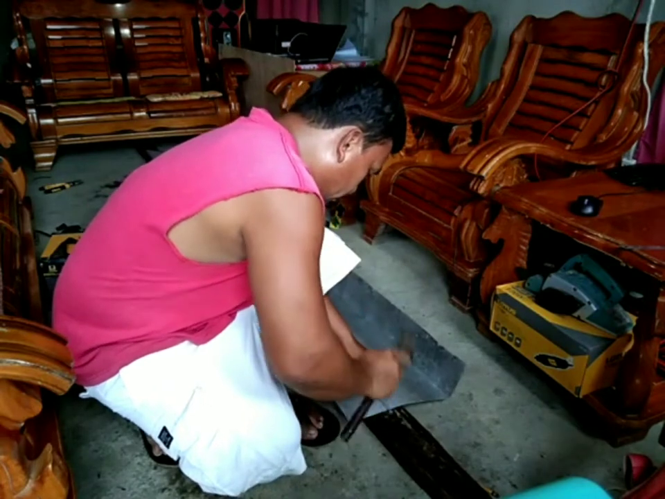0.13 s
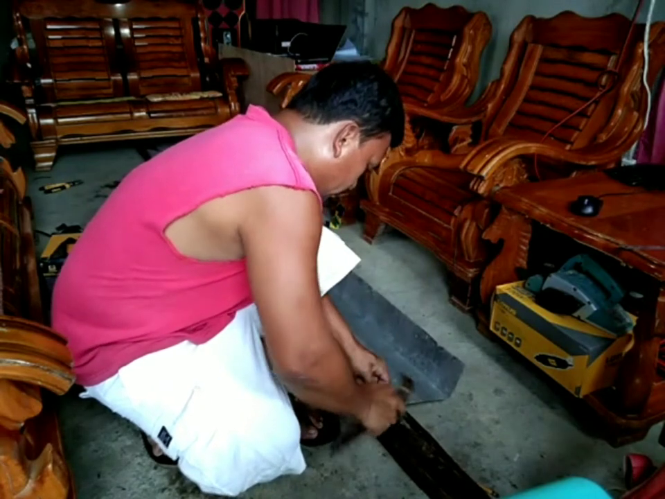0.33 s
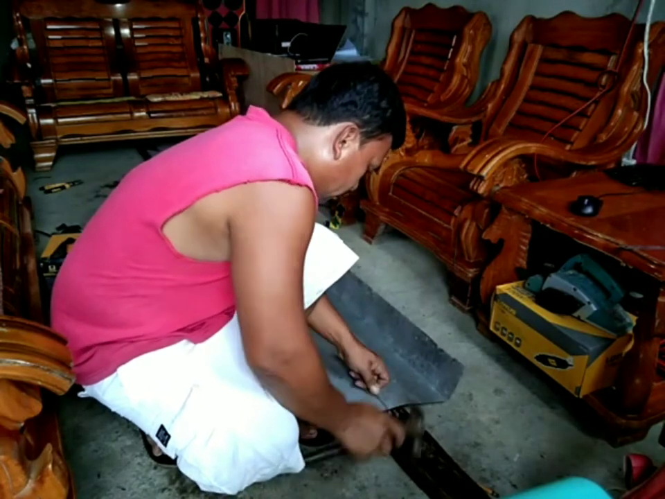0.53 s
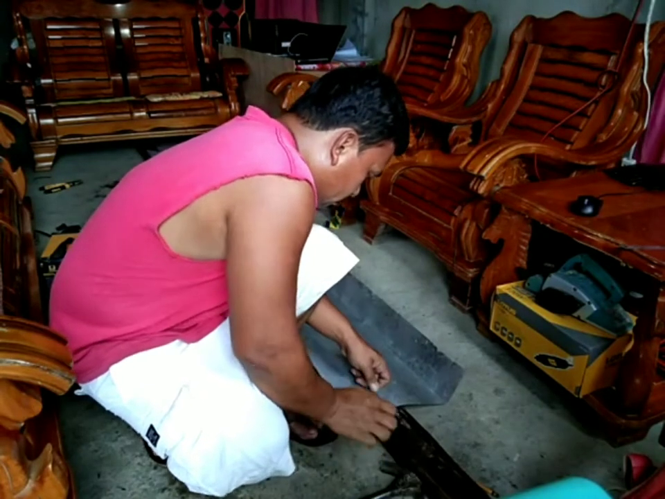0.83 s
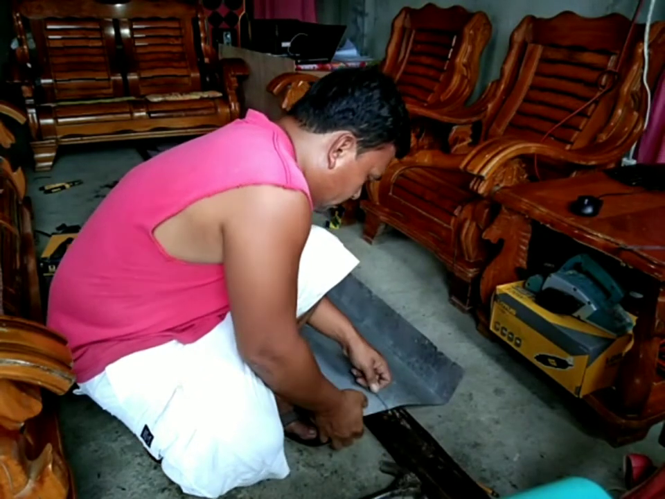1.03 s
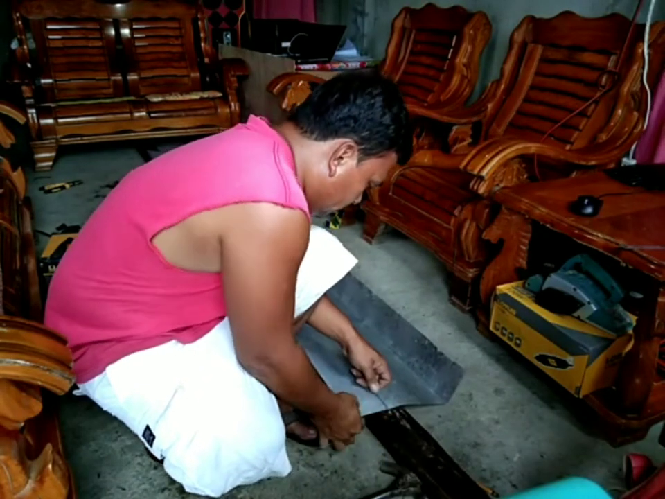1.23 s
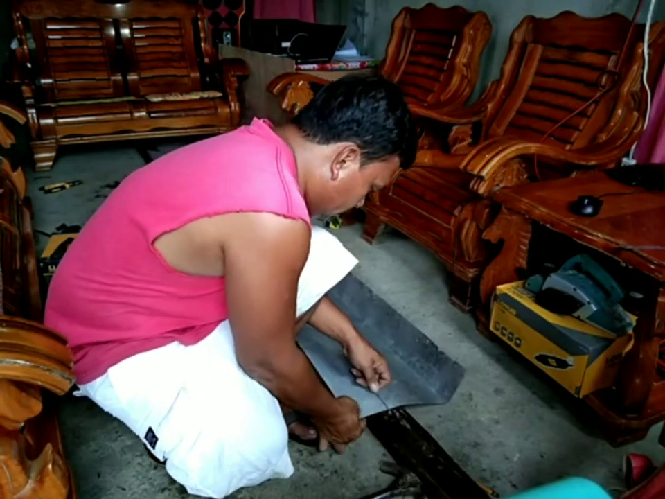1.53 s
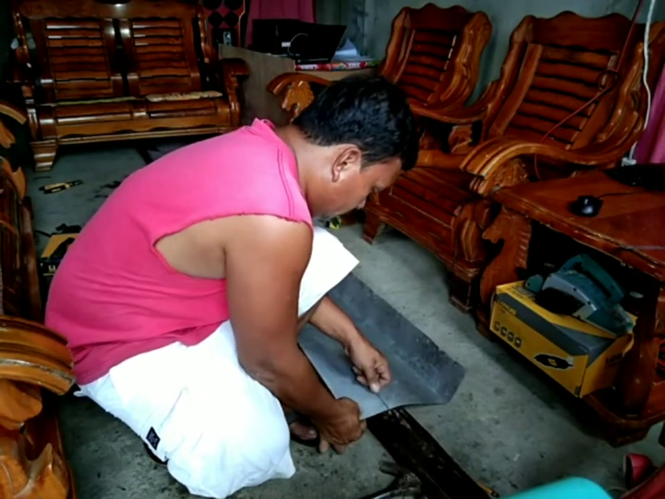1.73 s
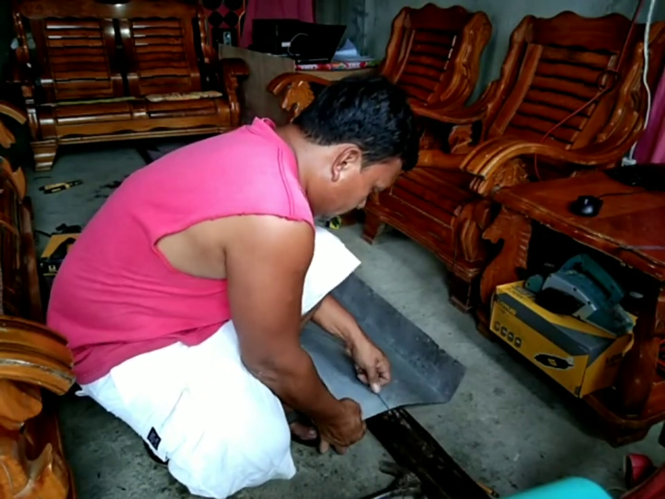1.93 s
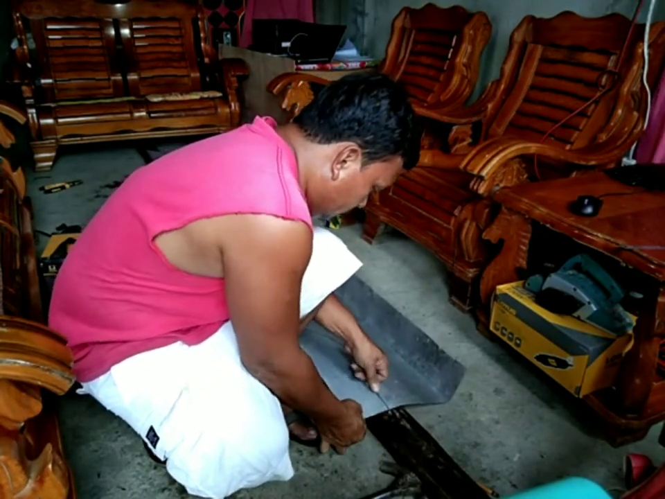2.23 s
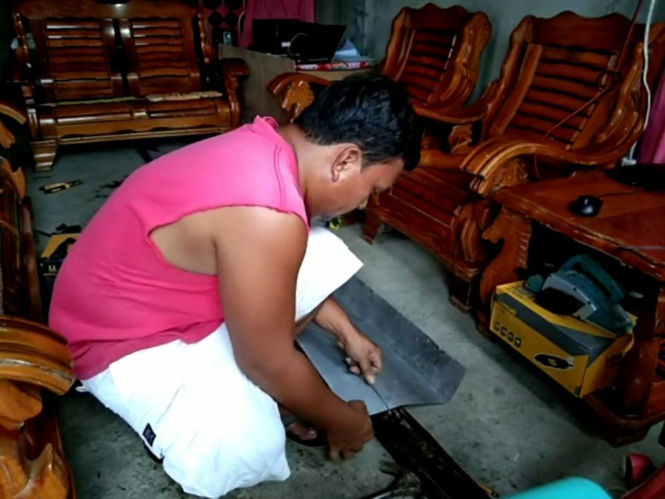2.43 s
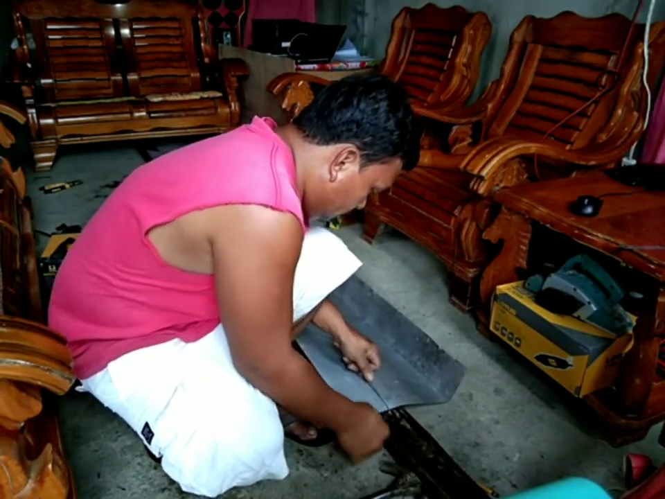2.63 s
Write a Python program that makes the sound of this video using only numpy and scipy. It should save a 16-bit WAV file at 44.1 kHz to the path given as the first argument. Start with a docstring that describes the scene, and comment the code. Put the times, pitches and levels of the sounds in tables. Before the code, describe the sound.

A thin metal sheet on a floor indoors, already ringing, crashes under two hammer blows at about 0.1 and 0.5 seconds, each thumping and spreading into a shimmer. Around 0.9 seconds a steel hammer and chisel clink down as the sheet rattles. The ringing fades by 1.5 seconds. A faint scrape comes near 2.4 seconds, then two soft flexing rattles. A low motor hums quietly throughout.

```python
"""Two hammer blows crash on a thin metal sheet lying on a floor indoors, over an earlier one dying away.
Each clicks and thumps, then spreads upward through the sheet's modes into a shimmer. A steel hammer and
chisel are put down and clink together; the sheet rattles softly as hands bend it, and a tool scrapes
its edge. A motor hums in the room throughout."""
import sys
import numpy as np
from scipy import signal
from scipy.fft import rfft, irfft, next_fast_len
from scipy.io import wavfile
from scipy.ndimage import uniform_filter1d, map_coordinates

SR = 44100
rng = np.random.default_rng(int(sys.argv[2]) if len(sys.argv) > 2 else 0)


def log_audio(samples):
    """Write samples as a 16-bit WAV file to the path given in sys.argv[1]."""
    # one column per channel
    frames = np.atleast_2d(samples).T
    # limit to full scale, then quantise
    limited = np.clip(frames, -1, 1)
    pcm = np.round(limited * 32767).astype(np.int16)
    wavfile.write(sys.argv[1], SR, pcm)


N = 123479

# hammer blows on the sheet, the first already dying away:
# start_s, shimmer_db, brightness_db_per_octave, hold_s, click_db, thump_db, knock_db
BLOWS = [(-.36, -12.5, 2.5, .14, -28, -29, -30), (.135, -14.5, 0.1, 0.2, -17.5, -17.5, -28.5),
         (0.456, -14, 2.5, 0.17, -20, -23, -19)]
TOP_HZ = 8450  # band limit


def amp(db):
    """Decibels to gain."""
    return 10 ** (np.asarray(db) / 20)


def unit(x):
    """Scale to rms 1."""
    return x / np.sqrt(np.mean(x ** 2) + 1e-20)


def along(points, hz):
    """Read (pitch_hz, value) points on a log frequency axis."""
    pitches, values = np.transpose(points)
    return np.interp(np.log(hz + 1), np.log(pitches + 1), values)


def since(start_s):
    """Seconds after the start, zero before it."""
    return np.maximum(np.arange(N) / SR - start_s, 0)


def fade(t, t60):
    """Exponential decay, 60 dB down after t60 seconds."""
    return np.exp(-np.log(1000) * t / t60)


def wobble(rate):
    """A smooth random curve, rate knots a second."""
    steps = np.arange(0, N, 32)
    knots = rng.standard_normal(int(N * rate / SR) + 4)
    return np.interp(np.arange(N), steps, map_coordinates(knots, [steps * rate / SR]))


def filtered(x, response):
    """Equalise x with the gain response(hz)."""
    size = next_fast_len(N + 8192)
    return irfft(rfft(x, size) * response(np.fft.rfftfreq(size, 1 / SR)), size)[:N]


def noise(response):
    """Noise of rms 1 shaped by response(hz)."""
    return unit(filtered(rng.standard_normal(N), response))


def coloured(colour):
    """Noise of rms 1 shaped by (pitch_hz, gain_db) points."""
    return noise(lambda hz: amp(along(colour, hz)))


def tone(hz, drift, rate):
    """A sine of rms 1 whose phase wanders by about drift radians."""
    return np.sqrt(2) * np.sin(2 * np.pi * (hz * since(0) + rng.random()) + drift * wobble(rate))


def motor(load_hz=253, load_width_hz=25):
    """A hum that throbs once a turn and fills out at higher speed, over low rumble and faint hiss."""
    # running speed: time_s, turns_per_s
    speed_curve = [(0, 26.3), (1.2, 27.3), (1.45, 26.8), (1.72, 25.9), (2.1, 25.75), (2.8, 25.75)]
    # hum lines: multiple_of_speed, level_db
    harmonics = [(2, -61.5), (4, -52), (5, -42.5), (6, -45), (7, -54.5), (9, -57.5), (10, -60), (13, -54),
                 (14, -50.5), (16, -53.5), (17, -58)]
    # rumble loudness: time_s, level_db
    rumble_level = [(0, -36.5), (0.899, -38.5), (1.352, -38.5), (1.55, -41), (1.75, -45.5), (2.3, -47.5),
                    (2.79, -43.5)]
    # rumble and hiss spectra: pitch_hz, gain_db
    rumble_colour = [(25, -32.5), (55, -10), (120, 0), (200, 0.5), (275, -2), (390, -0.5), (500, -9.5),
                     (620, -29), (1000, -37), (3000, -58.5)]
    hiss_colour = [(300, -2), (1000, -6), (3000, -8.5), (8000, -13.5)]
    speed = np.interp(since(0), *np.transpose(speed_curve))
    turns, hum = np.cumsum(speed) / SR, np.zeros(N)
    load_db = 6.5 * (speed - speed.min())
    for multiple, db in harmonics:
        in_load_band = np.exp(-((multiple * speed - load_hz) / load_width_hz) ** 2)
        phase = 2 * np.pi * multiple * turns + 0.36 * wobble(6.9)
        hum += amp(db + load_db * in_load_band) * np.sqrt(2) * np.sin(phase)
    hiss = amp(-69.5) * coloured(hiss_colour)
    rumble_db = np.interp(since(0), *np.transpose(rumble_level))
    return hum + hiss + amp(rumble_db) * coloured(rumble_colour)


def watery_tones(width_hz=75, flutter_db=2):
    """Faint, scattered, watery tones of a noise suppressor: narrow, fluttering swells of noise."""
    # swells of narrow noise: start_s, length_s, pitch_hz, level_db
    swells = [(1.27, .21, 2448, -65), (1.33, .16, 1890, -69), (1.37, .2, 803, -59), (1.52, .25, 1517, -69),
              (1.6, .28, 2457, -67), (1.71, .22, 814, -62), (1.78, .1, 1845, -71), (1.76, .37, 2106, -77),
              (2.02, .17, 2510, -71), (2.18, .11, 833, -60), (1.37, .17, 7240, -79)]
    flutter = amp(flutter_db * wobble(44.9))
    out = np.zeros(N)
    for start_s, length_s, pitch_hz, db in swells:
        arch = np.sin(np.pi * np.minimum(since(start_s) / length_s, 1))
        band = noise(lambda hz: 1 / (1 + ((hz - pitch_hz) / width_hz) ** 4))
        out += amp(db) * arch * flutter * band
    return out


def scrape(grain_count, spread_db=3):
    """A tool drags on the sheet's edge: a dense rasp of tiny ringing grains, then a few single ticks."""
    # the drag: start_s, length_s, level_db
    start_s, length_s, level_db = (2.372, .075, -57.5)
    # rasp spectrum: pitch_hz, gain_db
    colour = [(600, -0.5), (1600, 6.5), (2500, 3.5), (3200, -4), (5200, -2.5), (6400, -13.5), (7400, -1),
              (8400, -25)]
    # light taps on the edge: start_s, pitch_hz, level_db
    taps = [(2.378, 3520, -66), (2.446, 4280, -58), (2.465, 4000, -58.5), (2.588, 3870, -70),
            (2.608, 6200, -74), (2.637, 6200, -73)]
    grains, t = np.zeros(N + SR), np.arange(SR // 6) / SR
    decay = fade(t, t60=.12)
    for when, pitch, size in rng.random((grain_count, 3)):
        gain = np.sin(np.pi * when) ** .5 * amp(-spread_db * np.log(size + .02))
        onset = round((start_s + length_s * when) * SR)
        grains[onset:][:len(t)] += gain * decay * np.sin(2 * np.pi * TOP_HZ * pitch * t)
    rasp = unit(filtered(grains[:N], lambda hz: amp(along(colour, hz))))
    out = amp(level_db) * rasp * np.sqrt(length_s * SR / N)
    for tap_s, hz, db in taps:
        age = since(tap_s)
        out += amp(db) * (age > 0) * fade(age, t60=.11) * tone(hz, drift=0.8, rate=110)
    return out


def plate(spacing_hz, ripple_db, width_hz=7.6):
    """The sheet's frequency response: crowded random modes under a few strong ones."""
    # strongest modes: pitch_hz, boost_db
    modes = [(416, 10), (442, 5), (533, 10), (797, 3), (867, 4), (1033, 5), (1108, 6), (1519, 4), (1689, 5),
             (2233, 5), (2380, 6), (2494, 5), (2578, 4), (2869, 6)]
    grid = np.arange(0, SR / 2, 2)
    ripple = ripple_db * map_coordinates(rng.standard_normal(4000), [grid / spacing_hz], mode="wrap")
    peaks = sum(db / (1 + ((grid - hz) / width_hz) ** 2) for hz, db in modes)
    return lambda hz: np.interp(hz, grid, amp(ripple + peaks))


def shimmer(body, colour, tilt_db, envelope):
    """The sheet's modes shaken at random, tilted per octave, each pitch under envelope(hz, time_s)."""
    shaking = noise(lambda hz: body(hz) * amp(along(colour, hz) + tilt_db * np.log2((hz + 100) / 1500)))
    hz, t, bands = signal.stft(shaking, SR, nperseg=256)
    return signal.istft(bands * envelope(hz[:, None], t), SR, nperseg=256)[1][:N]


def flexes(body, rise_s=.01):
    """Hands bend the sheet, shaking its modes into short, dull rattles."""
    # bends: start_s, level_db, brightness_db_per_octave
    bends = [(0.712, -30.5, 0), (.85, -29.5, 7.5), (.92, -31.5, -3.5), (2.443, -38, 3), (2.672, -40, 0)]
    # rattle spectrum: pitch_hz, gain_db
    colour = [(150, -25.5), (250, -5), (710, -9), (873, -3), (1380, -18), (1550, -11.5), (1930, -31),
              (2300, -18), (2710, -38), (3970, -38), (7690, -52.5), (8400, -73.5)]
    # rattle decay: pitch_hz, t60_s
    ring_times = [(300, 0.89), (1000, 0.84), (2500, 0.5), (5000, 0.219)]
    out = np.zeros(N)
    for start_s, db, tilt_db in bends:
        def envelope(hz, t):
            age = np.maximum(t - start_s, 0)
            return (1 - np.exp(-age / rise_s)) * fade(age, along(ring_times, hz))
        out += amp(db) * np.sqrt(2) * shimmer(body, colour, tilt_db, envelope)
    return out


def steel_ring(modes, contacts, high_hz=6500, rise_s=.001, room_db=-10):
    """Each contact adds energy to every mode of a tool; the room holds the ring as a wavering tail."""
    out, t = np.zeros(N), np.arange(SR) / SR
    feedback = fade(1 / SR, t60=.32) ** 2
    for hz, db, t60 in modes:
        power = np.zeros(N + SR)
        decay = (fade(t, t60) * (1 - np.exp(-t / rise_s))) ** 2
        for start_s, hit_db, high_db in contacts:
            power[round(start_s * SR):][:SR] += amp(hit_db + high_db * (hz > high_hz)) ** 2 * decay
        room_power = signal.lfilter([1 - feedback], [1, -feedback], power[:N])
        echoes = amp(room_db) * np.sqrt(room_power / 2) * (wobble(110) + 1j * wobble(110))
        wave = (np.sqrt(power[:N]) + echoes) * np.exp(2j * np.pi * (hz * since(0) + rng.random()))
        out += amp(db) * np.sqrt(2) * wave.real
    return out


def tools(room_db=-6):
    """Hammer and chisel touch, drop and chatter together on the floor, ticking and ringing."""
    # contacts: start_s, hammer_db, chisel_db, tick_db, high_mode_boost_db
    clinks = [(.858, -34, -49, -54, 3), (.903, -36, -42, -52, 8), (.941, -25, -18, -21, 2),
              (.952, -26, -19.5, -32, 7), (.961, -27, -19, -31, 7), (.973, -27, -18, -38, 0),
              (.984, -26, -18, -38, -12), (.998, -24.5, -17, -33, -8), (1.009, -25.5, -18.5, -35, -10)]
    # modes of the two tools: pitch_hz, level_db, t60_s
    hammer_modes = [(2003, -12, .2), (2560, -17.5, .38), (4152, -3, .17), (4603, 0, .15), (7242, -8.5, .3)]
    chisel_modes = [(3225, -32, .36), (4327, 2, .1), (4452, -20, .2), (5166, -17.5, .18), (5666, -14, .16),
                    (5900, -19, .16), (7650, -17, .24), (8344, -32, .3)]
    # tick spectrum: pitch_hz, gain_db
    tick_colour = [(800, -8.5), (2000, -4.5), (3300, -7), (4400, 0), (5300, 3), (6500, -11.5), (7500, -1),
                   (8500, -14.5)]
    starts, hammer_db, chisel_db, tick_db, high_db = np.transpose(clinks)
    power = np.zeros(N)
    for start_s, db in zip(starts, tick_db):
        age = since(start_s)
        decay = fade(age, t60=.05) + amp(room_db) * fade(age, t60=.3)
        power += (age > 0) * (amp(db) * decay) ** 2
    ticks = np.sqrt(power) * coloured(tick_colour)
    hammer = steel_ring(hammer_modes, list(zip(starts, hammer_db, high_db)))
    chisel = steel_ring(chisel_modes, list(zip(starts, chisel_db, high_db)))
    return ticks + hammer + chisel


def thud(start_s, thump_db, knock_db, lag_s=.006, rise_s=.011):
    """Under the hammer the floor thumps and the sheet knocks with its low modes."""
    # hollow knock: pitch_hz, level_db, t60_s
    knock_modes = [(411, .5, .19), (534, -3, .22)]
    # spectrum of the knock's rattle: pitch_hz, gain_db
    colour = [(40, -25.5), (100, -8.5), (200, -3), (400, 0.5), (550, 3.5), (800, -15.5), (1500, -30.5),
              (4000, -60)]
    age = since(start_s + lag_s)
    thump = fade(age, t60=.18) * tone(hz=129.3, drift=0.99, rate=40)
    knock = sum(amp(db) * fade(age, t60) * tone(hz, drift=0.096, rate=40) for hz, db, t60 in knock_modes)
    rattle = amp(0.5) * fade(age, t60=.17) * coloured(colour)
    rise = 1 - np.exp(-(age / rise_s) ** 2)
    return 2 * rise * (amp(thump_db) * thump + amp(knock_db) * (knock + rattle))


def strikes():
    """The hammer head clicks and thuds on the sheet; afterwards it is set down with duller thuds."""
    # hammer set down: start_s, thump_db, knock_db
    set_downs = [(.708, -36.5, -43), (.912, -33, -32.5)]
    # click spectrum: pitch_hz, gain_db
    colour = [(200, -11.5), (900, -2), (1700, 7), (2600, -12), (5000, -11.5), (6200, -21), (7400, -8.5),
              (8500, -29)]
    out = np.zeros(N)
    for start_s, *_, click_db, thump_db, knock_db in BLOWS:
        age = since(start_s)
        crack = amp(0.5) * fade(age, t60=.0094)  # first contact
        out += amp(click_db) * (age > 0) * (fade(age, t60=.19) + crack) * coloured(colour)
        out += thud(start_s, thump_db, knock_db)
    return out + sum(thud(*contact) for contact in set_downs)


def crashes(body, knee_s=.033, hand_rests_s=1.21):
    """Shaking climbs from low modes to high, holds while the sheet buzzes on the floor, and dies."""
    # crash spectrum: pitch_hz, gain_db
    colour = [(41, -60), (70, -29), (133, -14.5), (156, -29.5), (179, -31), (327, -12.5), (425, -7.5),
              (701, -4), (1090, -0.5), (1230, -5), (1690, -2), (2030, -4.5), (2480, -5), (7300, -22),
              (8400, -35), (10900, -74.5)]
    # time for the shaking to reach a pitch: pitch_hz, rise_s
    rise_times = [(100, 0.0027), (500, 0.01), (1000, 0.018), (2000, 0.038), (4000, 0.055), (8000, 0.13)]
    # sheet decay: pitch_hz, t60_s
    ring_times = [(150, 5.6), (400, 2.2), (800, 1.39), (1700, 0.84), (3200, 0.64), (5000, 0.57),
                  (8000, 0.42)]
    out = np.zeros(N)
    for start_s, db, tilt_db, hold_s, *_ in BLOWS:
        def envelope(hz, t):
            age = np.maximum(t - start_s, 0)
            rise = 1 - np.exp(-(age / along(rise_times, hz)) ** 2)
            after_hold = knee_s * np.logaddexp(0, (age - hold_s) / knee_s)
            return rise * fade(after_hold, along(ring_times, hz))
        out += amp(db) * shimmer(body, colour, tilt_db, envelope)
    return out * fade(since(hand_rests_s), t60=1)  # a resting hand damps the sheet


def scene():
    """Sheet, faint watery tones, tools and motor in one channel."""
    body = plate(spacing_hz=15, ripple_db=1.0)
    sheet = crashes(body) + strikes() + flexes(body)
    return (sheet + watery_tones() + scrape(grain_count=260) + tools() + motor())[None]


def suppress(x, depth_db=-6):
    """A noise suppressor turns down each band while it is below its threshold."""
    # gate threshold: pitch_hz, level_db
    threshold = [(300, -100), (600, -81.5), (1100, -65), (2000, -82.5), (4000, -81.5), (8000, -91)]
    hz, _, bands = signal.stft(x, SR, nperseg=512)
    power = np.abs(uniform_filter1d(np.abs(bands) ** 2, size=5, axis=1))
    opening = power ** 2 / (power ** 2 + amp(along(threshold, hz))[:, None] ** 4)
    return signal.istft(bands * amp(depth_db * (1 - opening)), SR, nperseg=512)[1][:N]


def record(dry):
    """The microphone rounds off peaks; faint noise is suppressed and the top treble rolls off."""
    overload_level = 0.85
    edge = [(7700, 0), (8000, -5.5), (8400, -11.5)]  # pitch_hz, gain_db
    rounded = dry[0] / (1 + (dry[0] / overload_level) ** 6) ** (1 / 6)
    gated = suppress(rounded)
    return filtered(gated, lambda hz: amp(along(edge, hz)) / np.sqrt(1 + (hz / TOP_HZ) ** 140))[None]


dry = scene()
out = record(dry)
log_audio(out)
```